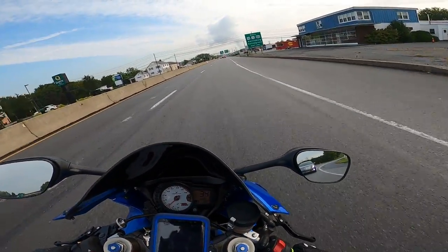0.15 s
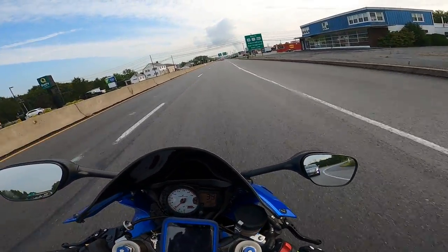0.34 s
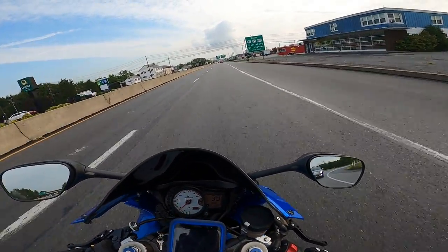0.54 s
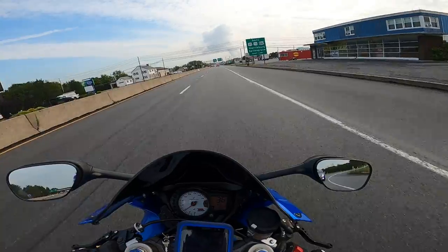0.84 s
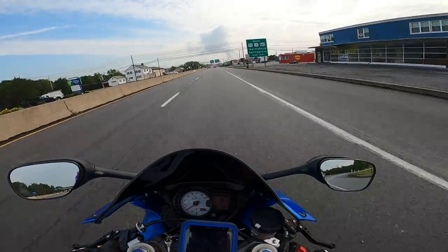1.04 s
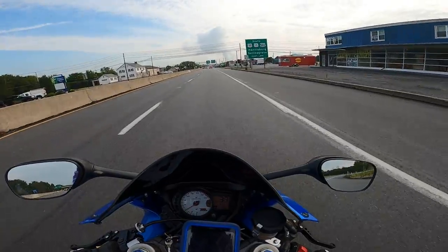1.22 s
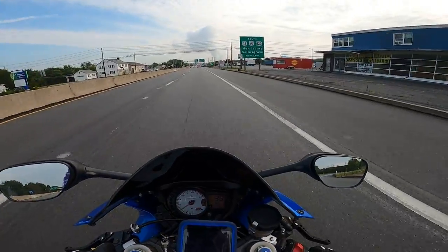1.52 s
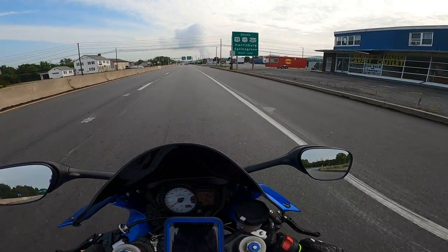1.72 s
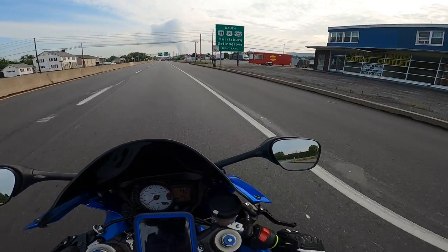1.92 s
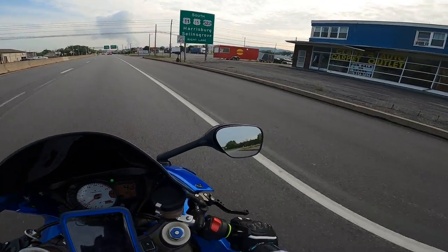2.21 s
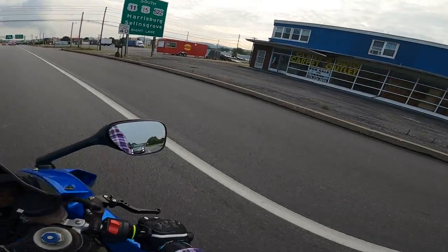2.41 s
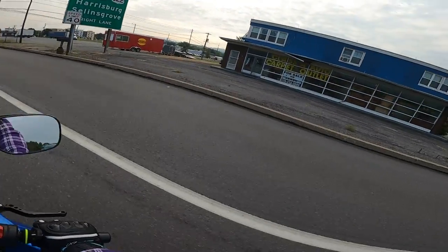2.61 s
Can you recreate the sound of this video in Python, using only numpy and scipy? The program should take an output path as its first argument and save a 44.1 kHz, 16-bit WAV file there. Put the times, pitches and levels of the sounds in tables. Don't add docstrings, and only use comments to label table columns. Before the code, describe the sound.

A sport motorcycle engine hums at high revs and rises steadily without a gear change, turning raspier as the throttle opens, with gear whine, road roar and low wind thumps on a muffled helmet microphone.

```python
import sys
import numpy as np
from scipy import signal
from scipy.fft import rfft, irfft, next_fast_len
from scipy.io import wavfile
from scipy.ndimage import uniform_filter1d, map_coordinates

SR = 44100
rng = np.random.default_rng(int(sys.argv[2]) if len(sys.argv) > 2 else 0)


def rack_gain(trim_db):
    fader = np.asarray(trim_db, float)
    return 10 ** (fader / 20)


def unload_audio(sound):
    columns = np.transpose(np.atleast_2d(sound))
    steps = np.round(np.clip(columns, -1, 1) * 32767)
    wavfile.write(sys.argv[1], SR, steps.astype(np.int16))


N = 121275

# time [s], crank rate [turns/s].
CRANK_SPEED = [(0.0, 114.05), (0.2, 115.56), (0.4, 117.98), (0.6, 120.31), (0.8, 123.2), (1.0, 126.4),
               (1.2, 129.86), (1.4, 133.09), (1.6, 136.65), (1.8, 139.86), (2.0, 143.08), (2.2, 146.2),
               (2.4, 149.46), (2.6, 152.09), (2.75, 155.61)]
# time [s], level [dB].
THROTTLE = [
    (0, -9),
    (.6, -9),
    (1.0, -2),
    (1.3, 1),
    (1.9, -1.5),
    (2.3, -3),
    (2.75, -1.5),
]
# order [multiple of crank rate], level [dB rms].
CRANK_ORDERS = [
    (.5, -29),
    (1, -13.5),
    (1.5, -34),
    (2, -15.5),
    (2.5, -18.5),
    (3, -16),
    (4, -18.5),
]
# frequency [Hz], gain [dB].
EXHAUST_RESPONSE = [(150, 0), (250, 0), (285, -7), (330, -24), (370, -17), (460, -9), (510, -4), (595, -23)]
# frequency [Hz], gain [dB].
BARK_RESPONSE = [(400, -34), (480, -12), (540, -6), (610, 1), (700, 1), (930, 0), (1060, -7), (1350, -19)]
# order [multiple of crank rate], resonance [Hz], resonance
# width [Hz], level [dB rms], phase blur [rad].
GEAR_MESHES = [(3.5, 512, 28, -29.5, .1), (5, 585, 40, -39, .2), (7.5, 895, 70, -34.5, .1),
               (9, 1080, 150, -44, .3), (7, 1060, 50, -42, .2), (8, 1230, 70, -40, .2),
               (17, 1990, 110, -56, 2), (18.5, 2600, 90, -59, 2), (39.2, 5020, 260, -63.5, 4)]
# frequency [Hz], density [dB per Hz].
ROAR_SPECTRUM = [(250, -17), (550, 0), (750, -13), (1000, -3), (1300, -9), (1600, -15), (2200, -22.5),
                 (3200, -42.5)]
# frequency [Hz], density [dB per Hz].
BUFFET_SPECTRUM = [(12, -8), (30, 1), (70, -4.5), (100, -7.5), (160, -13.5), (250, -11.5), (400, -25),
                   (800, -32.5)]
# centre time [s], frequency [Hz], peak [dB].
WIND_THUMPS = [
    (1.59, 100, -19),
    (1.945, 60.76, -16),
    (2.148, 72, -11),
    (2.358, 118, -13.5),
]
# frequency [Hz], density [dB per Hz].
HISS_SPECTRUM = [(1500, -25.5), (2500, 8), (3500, 2), (5000, 0.5), (6300, -2.5), (8800, -2.5),
                 (9700, -11.5), (11000, -12.5)]


def unit(x):
    return x / np.sqrt(np.mean(x ** 2) + 1e-20)


def along(points, hz):
    closed = list(points) + [(points[-1][0] * 2, -120)]
    f, db = np.transpose(closed)
    return np.interp(np.log(hz + 1), np.log(f + 1), db)


def curve(rows):
    return np.interp(np.arange(N) / SR, *np.transpose(rows))


def wobble(rate_hz):
    knots = rng.standard_normal(int(N * rate_hz / SR) + 4)
    return map_coordinates(knots, [np.arange(N) * rate_hz / SR])


def rise(total_db):
    return total_db * np.linspace(-.5, .5, N)


def filtered(x, response):
    m = next_fast_len(N + SR // 2)
    return irfft(rfft(x, m) * response(np.fft.rfftfreq(m, 1 / SR)), m)[:N]


def rush(spectrum, patchy_db):
    z = signal.stft(rng.standard_normal(N), nperseg=512)[2]
    patches = uniform_filter1d(rng.standard_normal(z.shape), 6, 0)
    patches = uniform_filter1d(patches, 8, 1)
    noise = signal.istft(z * rack_gain(patchy_db * unit(patches)), nperseg=512)[1][:N]
    return unit(filtered(noise, lambda hz: rack_gain(along(spectrum, hz))))


def drone(crank_hz, turns):
    cancel_hz, cancel_width_hz, cancel_db = 292, 3.2, -17
    shake_db, shake_rad, ring_lag_rad = .6, .04, 1.0
    out = np.zeros(N)
    for order, db in CRANK_ORDERS:
        hz = order * crank_hz
        level_db = db + along(EXHAUST_RESPONSE, hz) + shake_db * np.sqrt(order) * wobble(11)
        phase = 2 * np.pi * order * turns + shake_rad * order * wobble(18)
        sign = 1
        if order == 2:
            level_db += cancel_db * np.exp(-((hz - cancel_hz) / cancel_width_hz) ** 2)
            sign = -1
        if order in (.5, 1.5):
            level_db += curve(THROTTLE)
        if order == 4:
            phase -= ring_lag_rad
        out += sign * np.sqrt(2) * rack_gain(level_db) * np.cos(phase)
    return out


def bark(turns):
    bark_db, scatter_db = -26.8, .6
    lag_cycles, jitter_cycles = -.012, .0015
    smear_s_per_khz, smear_hz = .008, 720
    echo_s, echo_gain = .0081, -.35
    cycles = np.arange(1, int(turns[-1] / 2))
    chance = rng.standard_normal((len(cycles), 2))
    fire_turns = 2 * (cycles + lag_cycles + jitter_cycles * chance[:, 0])
    at = np.interp(fire_turns, turns, np.arange(N)).astype(int)
    pulses = np.bincount(at, rack_gain(scatter_db * chance[:, 1]), N)

    def pipe(hz):
        smear = np.exp(1j * np.pi * smear_s_per_khz * (hz - smear_hz) ** 2 / 1000)
        echo = 1 + echo_gain * np.exp(-2j * np.pi * hz * echo_s)
        return rack_gain(along(BARK_RESPONSE, hz)) * smear * echo

    return rack_gain(bark_db + curve(THROTTLE)) * unit(filtered(pulses, pipe))


def gears(crank_hz, turns):
    out = np.zeros(N)
    for order, casing_hz, width_hz, db, blur_rad in GEAR_MESHES:
        resonance = 1 / (1 + ((order * crank_hz - casing_hz) / width_hz) ** 2)
        level = np.sqrt(2) * rack_gain(db + 1.6 * wobble(25))
        out += level * resonance * np.sin(2 * np.pi * order * turns + blur_rad * wobble(150))
    return out


def roar(turns):
    roar_db, rise_db, gate_depth = -33.5, 0.5, .3
    crank_rad = 2 * np.pi * turns
    chop = np.cos(crank_rad) + 0.23 * np.cos(crank_rad / 2) + 0.54 * np.cos(2 * crank_rad)
    swell_db = rise(rise_db) + 0.2 * curve(THROTTLE) + .8 * wobble(5.2)
    return rack_gain(roar_db + swell_db) * (1 + gate_depth * chop) * rush(ROAR_SPECTRUM, patchy_db=1.5)


def wind():
    buffet_db, rise_db, lumpy_db, thump_cycles = -21, 3, .6, 3
    even = unit(np.tanh(.55 * rush(BUFFET_SPECTRUM, patchy_db=.2)))
    out = rack_gain(buffet_db + rise(rise_db) + lumpy_db * wobble(7.3)) * even
    for centre_s, hz, peak_db in WIND_THUMPS:
        cycles = (np.arange(N) / SR - centre_s) * hz
        envelope = np.exp(-(cycles / thump_cycles) ** 2 * 2)
        out -= rack_gain(peak_db) * envelope * np.cos(2 * np.pi * cycles)
    return out


def hiss():
    hiss_db, rise_db = -53, 4
    level_db = hiss_db + rise(rise_db) + 0.65 * wobble(28)
    return rack_gain(level_db) * rush(HISS_SPECTRUM, patchy_db=1.64)


def scene():
    crank_hz = curve(CRANK_SPEED)
    turns = np.cumsum(crank_hz) / SR
    engine = drone(crank_hz, turns) + bark(turns) + gears(crank_hz, turns)
    background = roar(turns) + wind() + hiss()
    return (engine + background)[None]


def band_limit(x):
    return signal.sosfilt(signal.butter(12, 12400, fs=SR, output="sos"), x)


def record(dry):
    return band_limit(dry)


dry = scene()
out = record(dry)
unload_audio(out)
```